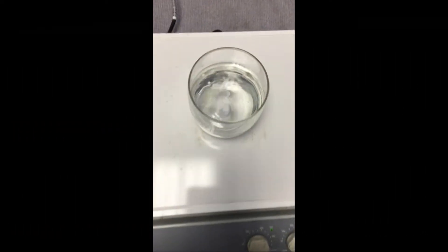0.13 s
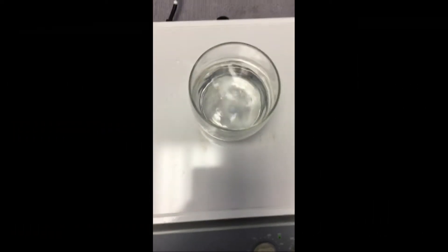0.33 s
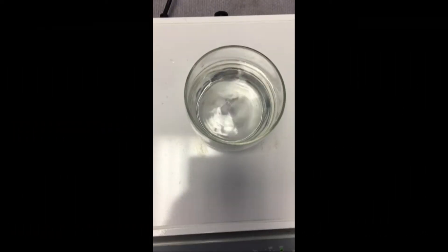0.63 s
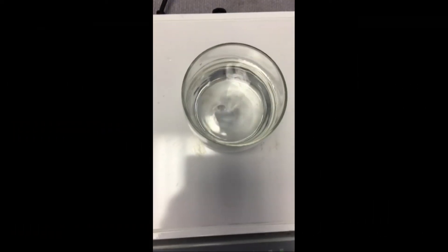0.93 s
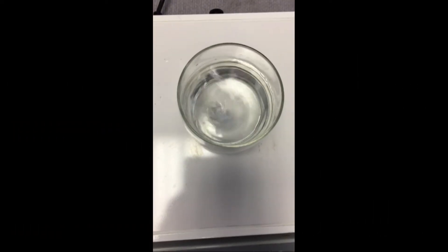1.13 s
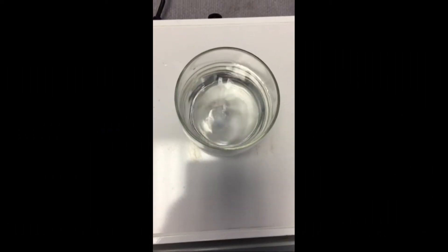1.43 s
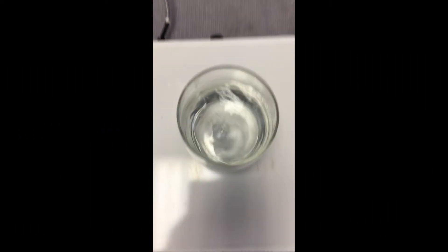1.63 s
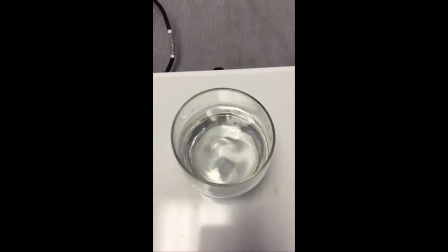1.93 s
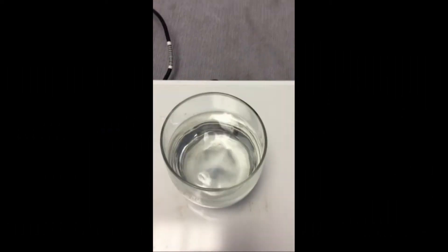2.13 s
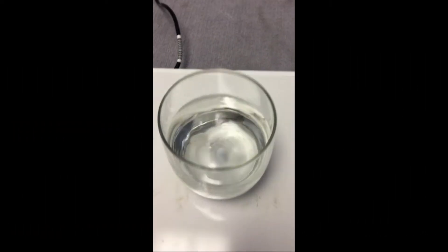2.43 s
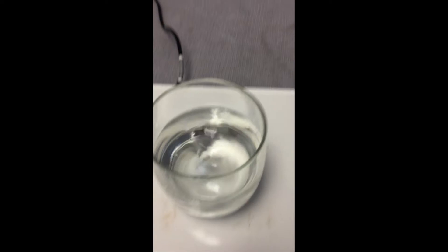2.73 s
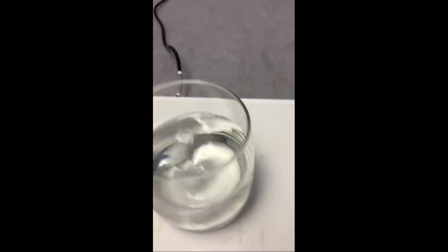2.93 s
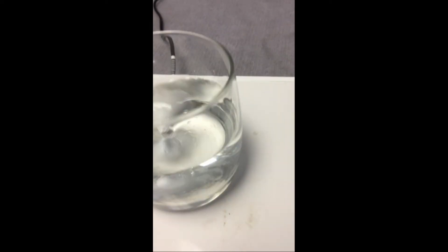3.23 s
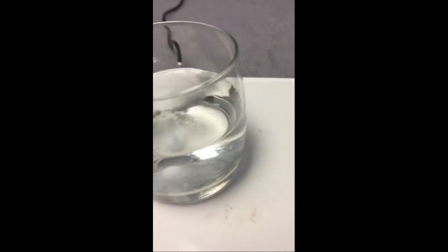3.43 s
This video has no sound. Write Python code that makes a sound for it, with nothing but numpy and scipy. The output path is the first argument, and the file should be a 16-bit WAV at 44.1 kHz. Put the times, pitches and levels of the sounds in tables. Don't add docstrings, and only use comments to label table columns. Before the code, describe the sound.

A magnetic stirring bar skitters and taps unevenly in a glass of water, gurgling at the start, around one second and strongest near three, over faint motor hum in a quiet room, heard close from above.

```python
import sys
import numpy as np
from scipy import signal
from scipy.fft import rfft, irfft
from scipy.io import wavfile
from scipy.ndimage import uniform_filter1d

SR = 44100
rng = np.random.default_rng(int(sys.argv[2]) if len(sys.argv) > 2 else 0)


def volts_from_db(level):
    exponent = np.asarray(level, float) / 20
    return 10 ** exponent


def log_audio(samples):
    frames = np.atleast_2d(samples).T
    limited = np.clip(frames, -1, 1)
    pcm = np.round(limited * 32767).astype(np.int16)
    wavfile.write(sys.argv[1], SR, pcm)


N = 158760

HALF_TURN_S, BOUNCE_S = 0.026, 0.0096


def ring(x, hz, width):
    return signal.lfilter(*signal.iirpeak(hz, hz / width, fs=SR), x)


def bank(x, modes):
    out = 0
    for hz, width, db in modes:
        out = out + volts_from_db(db) * ring(ring(x, hz, 2.2 * width), hz, 2.2 * width)
    return out


def unit(x):
    return x / np.sqrt(np.mean(x ** 2))


def walk(rate):
    hold = int(SR / rate)
    steps = np.repeat(rng.standard_normal(N // hold + 1), hold)
    return unit(uniform_filter1d(uniform_filter1d(steps, hold), hold)[:N])


def add(out, start_s, grain):
    i = max(int(start_s * SR), 0)
    out[i:i + len(grain)] += grain[:max(N - i, 0)]


def bubble(hz, t60, glide, rise):
    t = np.arange(int(t60 * SR)) / SR
    env = (1 - np.exp(-t / rise)) * np.exp(-np.log(1000) * t / t60)
    return env / env.max() * np.sin(2 * np.pi * hz * (t + glide * t ** 2 / t60))


# (landing time [s], time in the air [s])
BAR_HOPS = [(0.182, 0.028), (0.351, 0.026), (.459, 0.025), (0.562, 0.037), (0.917, 0.033), (1.082, 0.033),
            (1.17, 0.016), (1.253, 0.045), (1.456, 0.038), (1.643, 0.035), (1.767, 0.012), (1.905, 0.016),
            (2.019, 0.041), (2.157, 0.053), (2.264, 0.032), (2.375, 0.033), (2.492, 0.046), (2.62, 0.039),
            (2.88, 0.02), (3.08, 0.019), (3.187, 0.018), (3.41, 0.018), (3.51, 0.015)]


def touch(t):
    lift_s, airborne_db = 0.018, -17
    air = sum(np.clip((t - land + flight) / lift_s + 0.5, 0, 1) * (t < land) for land, flight in BAR_HOPS)
    return volts_from_db(airborne_db * np.clip(air, 0, 1))


def throb(t):
    lands = np.array([0] + [land for land, flight in BAR_HOPS])
    since = t - lands[np.searchsorted(lands, t, "right") - 1]
    return volts_from_db(-8.5 * (since / HALF_TURN_S % 1))


# (time [s], pressure level [dB], air in the water [dB])
SKITTER_COURSE = [(0, -50.5, -7), (.15, -53, -7.5), (.32, -51.5, -23), (0.399, -50, -21), (.75, -55, -17),
                  (0.901, -49, -10), (1.148, -52, -0.5), (1.55, -50, -11), (2.15, -50.5, -8),
                  (2.301, -52.5, -25), (2.8, -49, -20.5), (2.951, -51.5, 7.5), (3.299, -47.5, -5),
                  (3.6, -51.5, -10.5)]
# (frequency [Hz], width [Hz], level [dB])
FLOOR_MODES = [(260, 167, -3.5), (350.4, 60, -4), (581.8, 77.5, 3.5), (657, 19.6, 1), (1170.4, 32.5, -0.5),
               (1244, 272, -2.5)]
# (frequency [Hz], width [Hz], level [dB])
AERATED_MODES = [(1600, 260, 2.5), (2080, 226, -1), (2380, 170, -11.5), (2840, 186, -5), (4300, 160, -9),
                 (6440, 980, -25)]


def skitter():
    hits_per_s, scatter_db, level_db = 2200, 2.2, 4
    t = np.arange(N) / SR
    time_s, pressure_db, air_db = np.array(SKITTER_COURSE).T
    chance, sign, size = rng.random((3, N))
    hits = (chance < hits_per_s / SR) * np.sign(sign - 0.5) * volts_from_db(-scatter_db * np.log(size + 1e-9))

    timing, force = rng.standard_normal((2, 700))
    at = (np.cumsum(BOUNCE_S * np.exp(0.25 * timing)) * SR).astype(int)
    rock = np.zeros(N)
    rock[at[at < N]] = volts_from_db(6 + 5 * force[at < N])

    press = touch(t)
    beat = throb(t)
    body = bank((hits * volts_from_db(0.72 * walk(37.4)) + 0.5 * rock) * press * np.sqrt(beat), FLOOR_MODES)
    body = signal.sosfilt(signal.ellip(5, 1, 40, 1800, fs=SR, output="sos"), body)
    body = body - ring(body, 879, 780)

    drive = (1.25 * rock + 0.4 * hits) * press * beat * volts_from_db(np.interp(t, time_s, air_db))
    upper = sum(bank(drive * volts_from_db(4 * walk(30)), [mode]) for mode in AERATED_MODES)
    return volts_from_db(level_db + np.interp(t, time_s, pressure_db)) * (body + upper) / np.std(body)


# (time [s], peak level [dB], bubble [Hz], glass re bubble [dB])
EARLY_TAPS = [(0.458, -54, 5000, -31), (0.5063, -48.5, 4920, -31), (0.606, -48, 4620, -21),
              (0.6546, -47.5, 4370, -2), (0.703, -44.5, 4420, -9.5), (0.7552, -34, 4780, -33),
              (0.785, -46, 4700, -29), (0.8076, -40, 4640, -11), (0.8372, -43, 4400, -10.5),
              (.861, -43, 4520, -11), (0.9145, -37, 4370, -18), (0.9833, -24, 4070, -54),
              (1.0038, -37.5, 4340, 1.5), (1.028, -30, 4130, -11), (1.0837, -42.5, 4300, 1.5),
              (1.0918, -27.5, 4320, -17), (1.112, -50, 4300, 10), (1.1473, -44, 4300, -5.5),
              (1.1936, -41, 4290, -35), (1.2271, -46, 4580, -1.5), (1.2824, -39, 3100, -13.5),
              (1.368, -45, 3030, -5), (1.677, -48.5, 4980, -4.5), (1.704, -43, 2900, -7.5)]
LATE_TAPS = [(1.8189, -35.5, 2920, -11), (2.041, -52, 3030, 6), (2.1828, -64.5, 3230, 19.5),
             (2.2641, -47, 3480, -0.5), (2.624, -41, 4500, -2), (2.6518, -47.5, 4500, 7.5),
             (2.676, -39, 4440, -8), (2.7243, -39.5, 4620, -7), (2.7515, -34.5, 4180, -4),
             (2.777, -33, 4300, -5), (2.805, -24.5, 3790, -16), (2.8282, -25.5, 4070, -4.5),
             (2.884, -26, 3870, -20), (2.9084, -18.5, 3980, -28), (2.934, -21.5, 4150, -20),
             (2.994, -30.5, 5280, -2.5), (3.049, -30, 4090, -5), (3.1023, -32.5, 3800, -15),
             (3.212, -40, 4080, -36), (3.3169, -43, 4100, -29)]
# (frequency [Hz], width [Hz], level [dB])
WALL_MODES = [(3598, 330, 12), (4835, 320, 12), (5650, 380, 12.5), (7010, 160, 12), (8400, 306, 2)]


def half_turn_ticks(taps_played):
    lands = [land for land, flight in BAR_HOPS] + [N / SR]
    swing = walk(25.29)
    ticks = []
    for land, following in zip(lands, lands[1:]):
        for s in np.arange(land, following - 0.03, HALF_TURN_S):
            db = -65.5 + 3.1 * min(swing[int(s * SR)], 1)
            if min(abs(s - tap[0]) for tap in taps_played) > HALF_TURN_S / 2:
                ticks.append((s, db, 4800, 2.2))
    return ticks


def taps():
    bubble_db, glass_db = 3, 2.5
    out, wall = np.zeros(N), np.zeros((len(WALL_MODES), N))
    rows = EARLY_TAPS + LATE_TAPS
    rows = rows + half_turn_ticks(rows)
    for s, db, hz, glass_rel in rows:
        stray, force = rng.standard_normal((2, 3))
        mode_luck = rng.standard_normal(len(WALL_MODES))
        for k in range(3):
            at = s + k * BOUNCE_S * (1 + 0.034 * stray[k])
            level = db
            if k > 0:
                level = db + min(-7 * k + 15 * force[k], -6.5)
            pitch = hz * (1 + 0.047 * k * stray[k])
            add(out, at - 0.0005, volts_from_db(level + bubble_db) * bubble(pitch, 0.015, 0.012, 0.0002))
            strike_db = level + glass_rel - 4.9 * k + glass_db + 5.8 * np.clip(mode_luck, -2, 1.2)
            wall[:, min(int(at * SR), N - 1)] += volts_from_db(strike_db)

    decay = np.exp(-np.arange(600) / SR / 0.0021)
    chatter = rng.standard_normal((len(WALL_MODES), 600)) * decay
    chatter = chatter / np.linalg.norm(chatter, axis=1, keepdims=True) + np.eye(1, 600)
    peak = np.abs(bank(np.eye(1, 999)[0], WALL_MODES)).max()
    for strikes, rattle, mode in zip(wall, chatter, WALL_MODES):
        out += bank(signal.fftconvolve(strikes, rattle)[:N], [mode]) / peak
    return out


# (time [s], peak level [dB], frequency [Hz])
RIM_PINGS = [(0.8365, -54, 11600), (0.9133, -55.5, 11700), (.9721, -49, 5600), (1.004, -27, 5850),
             (1.113, -46, 11600), (1.282, -54, 11240), (1.369, -53, 11450), (1.7042, -53.5, 11540),
             (1.8178, -56, 11700), (1.857, -45, 4900), (1.9287, -48, 6800), (2.0403, -48.5, 11700),
             (2.0717, -53, 11700), (2.0728, -46, 6900), (2.183, -53, 11700), (2.2638, -51, 11700),
             (2.29, -60, 11700), (2.7509, -44, 8400), (2.806, -39, 8280), (2.844, -25, 4300),
             (3.295, -43, 4280), (3.371, -46, 4300), (3.429, -52, 6100)]


def pings():
    out = np.zeros(N)
    for s, db, hz in RIM_PINGS:
        for k in range(2):
            add(out, s + k * BOUNCE_S, volts_from_db(db - 12 * k) * bubble(hz, 0.012, 0, 0.00024))
    return out


# (time [s], peak level [dB], frequency [Hz])
FIRST_POCKETS = [(0.004, -29.5, 1270), (0.0211, -28, 1322), (0.06, -26.5, 1420), (0.082, -29.5, 1600),
                 (0.1133, -28, 1647), (0.137, -32, 1728), (0.1826, -35.5, 1760), (0.915, -39, 1980),
                 (1.0035, -34.5, 1990), (1.0298, -29.5, 1665), (1.1143, -27, 1613), (1.124, -25, 1514),
                 (1.1426, -30, 1800), (1.1721, -23.5, 1590), (1.1968, -30, 1757), (1.2536, -31, 1250),
                 (1.268, -27.5, 1393), (1.2833, -34.5, 1330), (1.2987, -24, 1330), (1.4569, -29.5, 1350),
                 (1.513, -30, 1516), (1.6579, -32, 1980), (1.6848, -26.5, 1815)]
SECOND_POCKETS = [(2.921, -30, 1750), (2.9484, -18, 1315), (2.9678, -26.5, 1525), (3.004, -24.5, 1760),
                  (3.029, -32, 1360), (3.0823, -35, 1650), (3.1045, -21, 1281), (3.127, -25, 1380),
                  (3.1418, -22.5, 1626), (3.2171, -34, 2330), (3.3016, -37, 1640), (3.3243, -37, 2250),
                  (3.3772, -41, 2050)]


def gurgle():
    out = np.zeros(N)
    for s, db, hz in FIRST_POCKETS + SECOND_POCKETS:
        length, delay, detune = rng.random(3)
        t60 = 0.085 * (0.48 + 0.47 * length)
        add(out, s - 0.002, volts_from_db(db - 4.5) * bubble(hz, t60, 0.04, 0.0021))
        neighbour_hz = hz * (0.9 + 0.302 * detune)
        add(out, s + 0.01 * delay, volts_from_db(db - 5) * bubble(neighbour_hz, 0.02, 0.04, 0.00086))
    return out


def froth():
    per_s, centre_hz, spread_oct, cycles, level_db = 200, 1843, 0.442, 20.7, 6.5
    out = np.zeros(N)
    time_s, pressure_db, air_db = np.array(SKITTER_COURSE).T
    gap, size = rng.random((2, 2500))
    pitch, glide = rng.standard_normal((2, 2500))
    at = np.cumsum(-np.log(gap + 1e-9)) / per_s
    db = level_db + np.interp(at, time_s, pressure_db + air_db) - 2 * np.log(size + 1e-9)
    gain = touch(at) * volts_from_db(db)
    for s, g, p, q in zip(at[at < N / SR], gain, pitch, glide):
        hz = np.clip(centre_hz * 2 ** (spread_oct * p), 1200, 9000)
        grain = bubble(hz, cycles / hz, 0.23 * q, 0.00022)
        add(out, s, g * (centre_hz / hz) ** 0.37 * grain)
    return out


# (time [s], length [s], start frequency [Hz], end frequency [Hz], level [dB])
BUBBLE_CLOUDS = [(0, 0.13, 2950, 2830, -54), (0.069, 0.062, 2080, 2040, -39),
                 (0.182, .14, 2235, 2066, -52.5), (0.243, 0.07, 2400, 2760, -59),
                 (1.264, 0.041, 2090, 2176, -37.5), (1.321, 0.094, 1480, 1652, -44),
                 (1.463, 0.13, 3030, 2980, -53.5), (1.519, 0.06, 2100, 1950, -46),
                 (1.771, 0.16, 2700, 2250, -57), (1.906, 0.12, 2350, 2376, -51),
                 (2.018, 0.086, 2400, 2430, -53), (2.155, .07, 2610, 2560, -57.5),
                 (3.2, 0.084, 2830, 2830, -53), (3.231, 0.11, 1600, 1770, -41),
                 (3.211, 0.21, 3990, 4060, -72), (3.399, 0.2, 2337, 2423, -51),
                 (3.519, 0.082, 3620, 3920, -57.5)]


def strands():
    width_hz, edge_s = 87, 0.0069
    out, time = np.zeros(N), np.arange(N) / SR
    grip = uniform_filter1d(touch(time), 300)
    for s, length, hz, end_hz, db in BUBBLE_CLOUDS:
        t = np.arange(int(length * SR)) / SR
        real, imag = rng.standard_normal((2, 12000))
        shake = signal.lfilter(*signal.butter(2, width_hz, fs=SR), real + 1j * imag)
        shake = shake[2000:2000 + len(t)]
        carrier = np.exp(2j * np.pi * (hz * t + (end_hz - hz) * t ** 2 / (2 * length)))
        tone = unit(((shake / np.std(shake) + 0.71) * carrier).real)
        fade = np.clip(np.minimum(4 * t, length - t) / edge_s, 0, 1)
        add(out, s, volts_from_db(db) * tone * fade)
    return out * grip * throb(time)


# (time [s], peak level [dB], frequency [Hz])
SURFACE_SPITS = [(1.035, -46, 12800), (1.069, -38, 11800), (1.096, -40, 13100), (1.112, -49, 9600),
                 (1.6052, -50, 14570), (1.8368, -54, 12700), (2.3384, -49.5, 14200), (2.9104, -42, 8900),
                 (2.948, -39.5, 11100), (2.9921, -36, 8000), (3.004, -48, 11500), (3.023, -39, 8200),
                 (3.0474, -42, 8160), (3.0772, -39, 8400), (3.158, -37, 14200), (3.484, -53, 14200)]


def spits():
    q, decay_s, level_db = 1.76, 0.0017, 5
    out, t = np.zeros(N), np.arange(900) / SR
    for s, db, hz in SURFACE_SPITS:
        burst = volts_from_db(db + level_db) * rng.standard_normal(len(t)) * np.exp(-t / decay_s)
        add(out, s, ring(ring(burst, hz, hz / q), hz, hz / q))
    return out


# (frequency [Hz], level [dB], wander [dB])
MOTOR_LINES = [
    (36, -63.5, -2.5),
    (59.7, -59, -5),
    (107.7, -51.5, 1.65),
    (119.4, -58.5, -4.1),
]


def hum():
    fade_db_per_s = -2.5
    out, t = np.zeros(N), np.arange(N) / SR
    for hz, db, wander_db in MOTOR_LINES:
        level = db + wander_db * walk(4.25) + fade_db_per_s * (t - 1.43) * (hz < 115)
        phase = 2 * np.pi * hz * np.cumsum(1 + 0.00613 * walk(2.2)) / SR
        out += np.sqrt(2) * volts_from_db(level) * np.sin(phase)
    return out


# (frequency [Hz], level [dB])
ROOM_COLOUR = [(30, 0.5), (70, -4), (350, -12), (800, -19), (1400, -24.5), (3000, -32.5), (10500, -46),
               (16000, -45)]


def room():
    f = np.fft.rfftfreq(N, 1 / SR) + 1
    hz, db = np.array(ROOM_COLOUR).T
    tilt = volts_from_db(np.interp(np.log(f), np.log(hz), db))
    return volts_from_db(-52) * unit(irfft(rfft(rng.standard_normal(N)) * tilt, N))


def scene():
    wet_db, wet_t60_s = -13, 0.06
    near = skitter() + taps() + pings() + gurgle() + froth() + strands() + spits()
    t = np.arange(6000) / SR
    tail = rng.standard_normal(len(t)) * np.exp(-np.log(1000) * t / wet_t60_s)
    wet = signal.fftconvolve(near, tail / np.sqrt(np.sum(tail ** 2)))[:N]
    return (near + volts_from_db(wet_db) * wet + hum() + room())[None]


def band_limit(x):
    return signal.sosfilt(signal.butter(12, 16500, fs=SR, output="sos"), x)


def record(dry):
    low_cut = signal.butter(5, 31, "high", fs=SR, output="sos")
    high_cut = signal.ellip(8, 0.2, 50, 15900, fs=SR, output="sos")
    mix = signal.sosfilt(np.vstack([low_cut, high_cut]), dry)
    return band_limit(mix)


dry = scene()
out = record(dry)
log_audio(out)
```